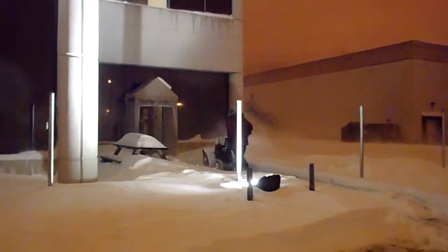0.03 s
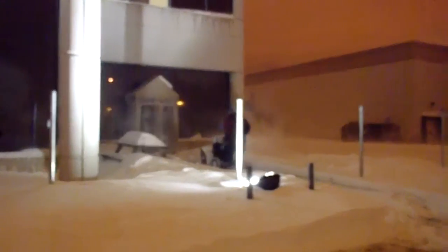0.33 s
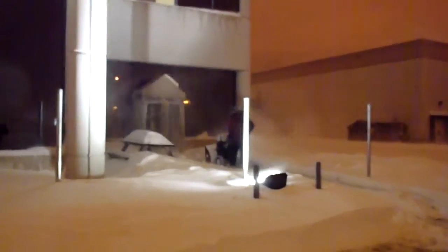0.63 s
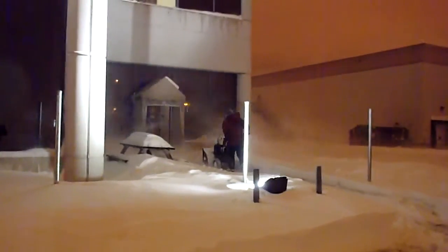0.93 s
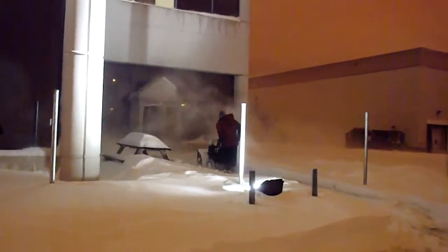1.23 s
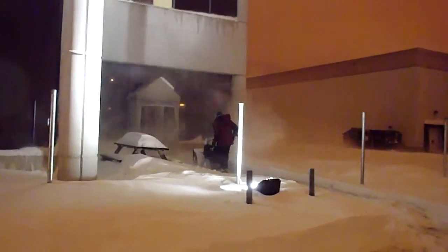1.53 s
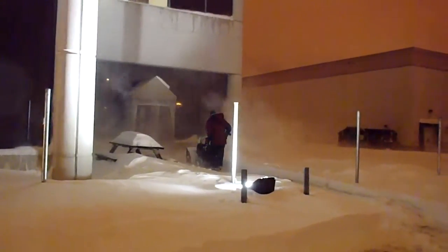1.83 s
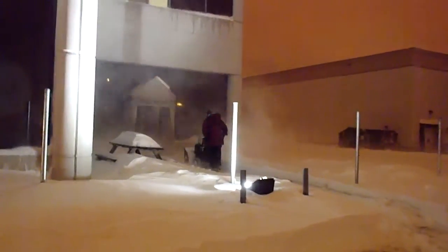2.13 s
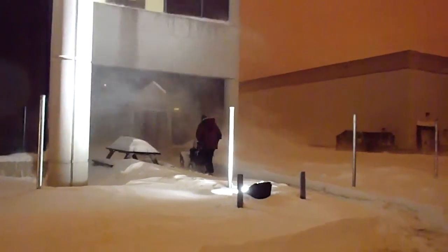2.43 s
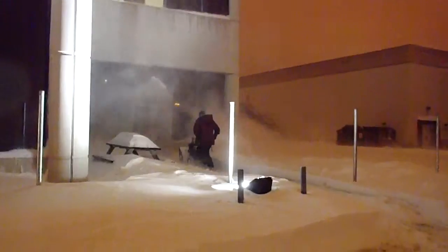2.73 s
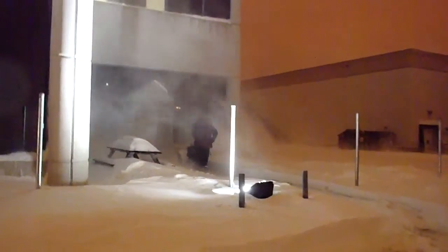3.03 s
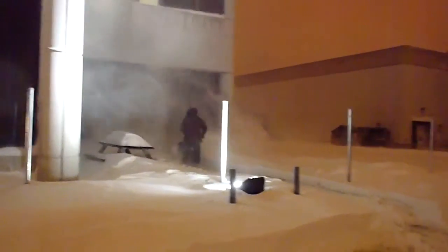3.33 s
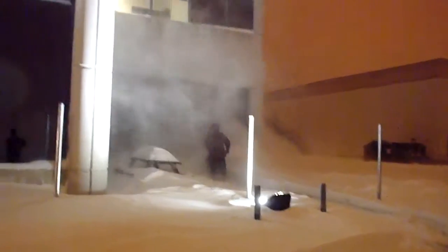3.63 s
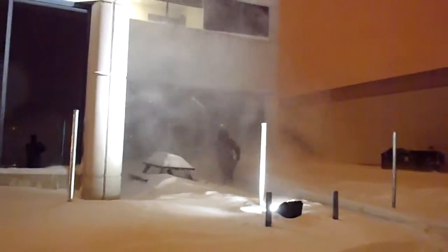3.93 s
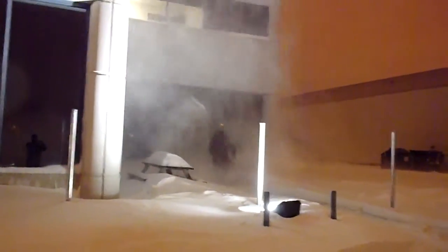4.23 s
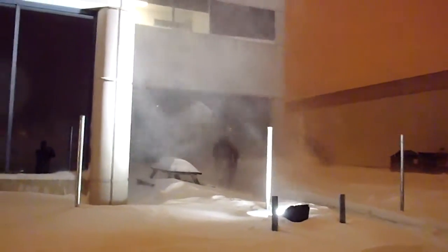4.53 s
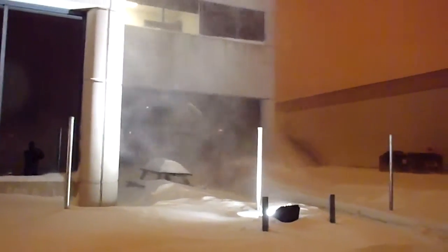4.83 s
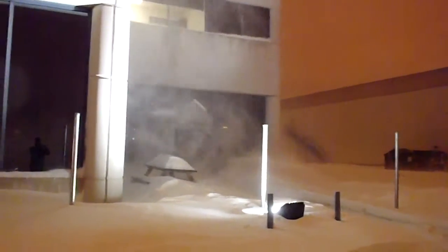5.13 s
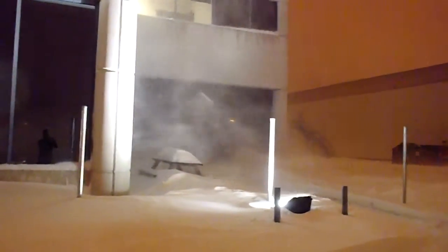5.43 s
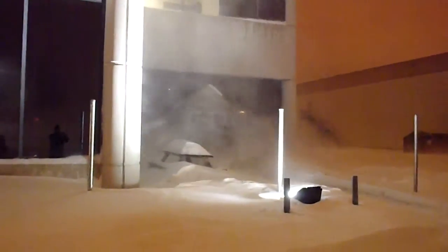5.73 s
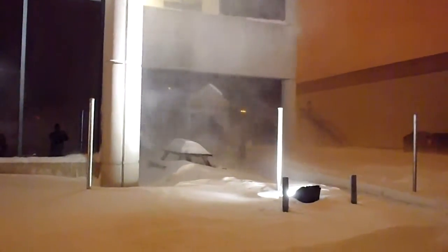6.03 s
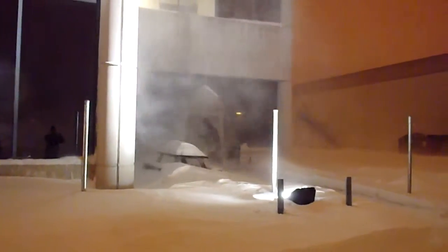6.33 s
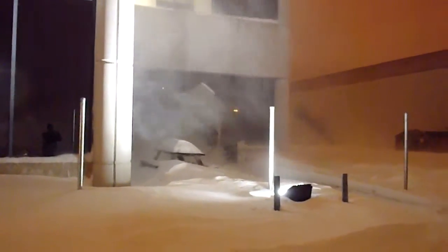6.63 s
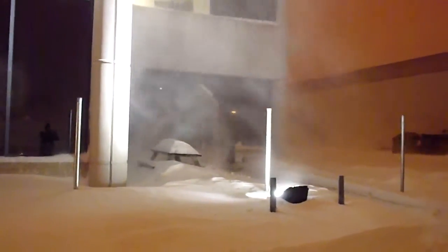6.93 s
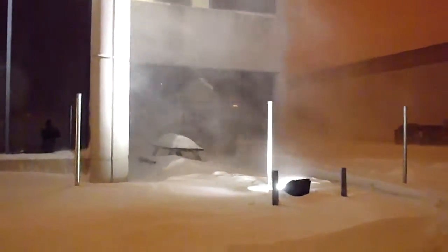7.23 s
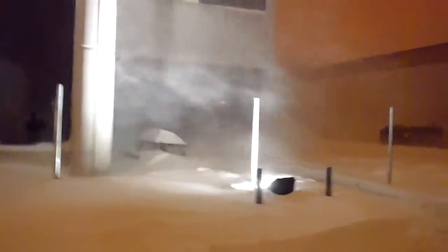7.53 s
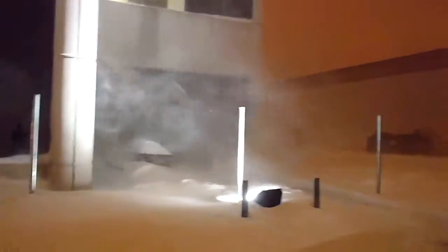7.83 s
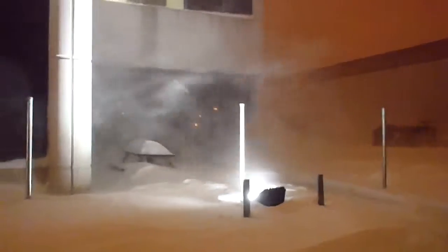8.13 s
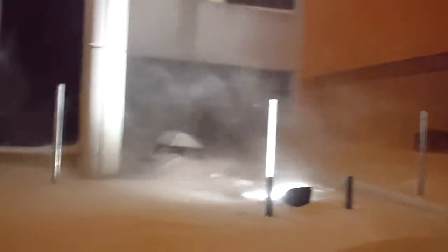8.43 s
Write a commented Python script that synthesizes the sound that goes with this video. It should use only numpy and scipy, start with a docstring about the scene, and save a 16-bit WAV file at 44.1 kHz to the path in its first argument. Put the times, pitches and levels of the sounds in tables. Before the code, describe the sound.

A snow blower engine chugs rapidly and fades away as gusty wind buffets, rumbles and crackles on the microphone.

```python
"""A snow blower works its way off through a night snowstorm, heard from a hand-held camera.
At first its single cylinder chuffs 25 times a second, each jet of gas ringing the muffler, while the
impeller churns snow and eddies thump the microphone. The engine gains a little speed, and by 5 s the
chuffs have faded into the rush; rubbing metal then squeals briefly. Toward the end the wind dominates
with rumble, blasts and crackle. Throughout, the gain control ducks behind loud blasts."""
import sys
import numpy as np
from scipy import signal
from scipy.fft import rfft, irfft
from scipy.io import wavfile
from scipy.ndimage import uniform_filter1d, map_coordinates

SR = 44100
rng = np.random.default_rng(int(sys.argv[2]) if len(sys.argv) > 2 else 0)


def log_audio(samples):
    """Write samples as a 16-bit WAV file to the path given in sys.argv[1]."""
    # one column per channel
    frames = np.atleast_2d(samples).T
    # limit to full scale, then quantise
    limited = np.clip(frames, -1, 1)
    pcm = np.round(limited * 32767).astype(np.int16)
    wavfile.write(sys.argv[1], SR, pcm)


N = 383669
TIME = np.arange(N) / SR

# engine speed: time_s, firing_rate_hz
FIRING_RATE = [(0.0, 25.1), (0.5, 24.92), (1.0, 24.99), (1.4, 25.1), (1.8, 25.75), (2.2, 26.1),
               (2.6, 26.57), (3.0, 26.71), (3.4, 26.94), (3.8, 27.02), (4.2, 26.88), (4.6, 26.9),
               (5.0, 27.0), (5.4, 28.5), (5.8, 28.6), (6.3, 28.0), (7.0, 28.0), (8.7, 28.0)]
# loudness of the chuffs, dipping under the wind and fading out by 5 s: time_s, level_db
CHUFF_LEVEL = [(0.0, -17.5), (0.35, -19), (0.47, -31.5), (0.8, -22.5), (1.05, -20), (1.42, -22), (1.9, -30),
               (2.2, -27.5), (2.35, -20), (2.46, -33), (2.8, -28), (3.05, -21), (3.26, -28), (3.54, -23),
               (4.25, -28), (4.5, -36), (5.0, -46.5), (8.7, -52.5)]
# firings that crack harder than their neighbours: time_s, extra_db
HARD_FIRINGS = [(0.61, 3.5), (1.21, 2.5), (1.69, 7), (2.30, 2), (2.38, 3), (2.53, 6.5), (2.94, 4),
                (3.09, 5), (3.43, 6), (3.47, 5), (3.54, 4.5), (3.76, 5.5), (3.80, 1.5), (4.02, 6.5),
                (4.24, 4)]
# modes of the muffler's sheet metal: pitch_hz, width_hz, gain_db
MUFFLER_MODES = [(2750, 32, -3), (3206, 32, -6), (3506, 14, 1), (5250, 120, -13)]
# how strongly those modes ring: time_s, gain_db
MUFFLER_RING = [(0, -17), (1.2, 7.5), (1.9, -16), (2.35, 6.5), (2.9, 2), (3.4, -1.5), (3.7, 6.5),
                (4.2, 4.5), (5, 3)]
# reflections off building fronts: delay_s, gain_db
WALL_ECHOES = [(0.012, -26), (0.023, -21), (.047, -24.5)]
# low harmonics of the exhaust: multiple_of_firing_rate, level_db
DRONE_HARMONICS = [(2, -40.5), (3, -38.5), (4, -46.5), (5, -36), (6, -40), (7, -53), (9, -42.5),
                   (10, -48.5)]
# rush of the machine and its thrown snow: time_s, level_db
RUSH_LEVEL = [(0.0, -36), (0.5, -47), (1.06, -36.5), (1.4, -45), (1.65, -37), (2.1, -47), (2.74, -42),
              (3.05, -54), (3.3, -44.5), (3.56, -32), (3.85, -45), (4.2, -34), (4.8, -42), (5.2, -33.5),
              (5.75, -41), (6.25, -37), (6.55, -40), (8.7, -50)]
# squeals of rubbing metal: centre_s, level_db, length_s, pitch_hz, nominal_width_hz
SQUEALS = [(4.995, -33, 0.012, 2930, 200), (5.524, -49, 0.46, 1146, 20), (5.876, -41, 0.073, 2640, 200),
           (6.103, -38, 0.076, 2620, 180), (6.208, -37.5, 0.079, 2610, 220), (6.24, -39, 0.047, 2980, 360)]
# wind between the blasts: time_s, buffeting_db, rumble_db
BREEZE = [(0.0, -32.5, -33), (0.3, -30.5, -27), (0.68, -37, -21), (0.85, -36, -42), (1.05, -22.5, -33),
          (1.52, -31, -24.5), (1.85, -24, -25.5), (2.72, -21, -23), (2.92, -33.5, -37),
          (3.15, -22.5, -18.5), (3.45, -29, -30.5), (3.92, -26.5, -29), (4.2, -19.5, -25),
          (5.2, -21, -23.5), (5.6, -35.5, -43), (5.95, -19.5, -27.5), (7.05, -20, -18.5), (8.7, -25, -19.5)]
# hard blasts of wind: centre_s, level_db, length_s, relative_rasp_db, relative_thump_db
BLASTS = [(0.213,-27,0.055,-16,3), (0.394,-18,0.049,-12,-4), (0.454,-23,0.013,-9,-11),
          (0.508,-17,0.036,-14,1), (0.641,-13.5,0.025,-18.5,-5), (0.686,-16.5,0.019,-16,-2),
          (0.746,-13.5,0.031,-15,-3), (0.793,-16.5,0.015,-20,-10), (0.977,-9.5,0.0037,-10,-13),
          (1.159,-14,0.017,-10,-21), (1.229,-15.5,0.032,-17.5,-15), (1.299,-15.5,0.007,-14,-14),
          (1.376,-19,0.05,-13,1), (1.418,-17.5,0.023,-6,-15), (1.623,-23,0.0064,-7,7.5),
          (1.697,-20,0.011,-11.5,2), (1.755,-14.5,0.013,-9.5,-11), (1.81,-16,0.063,-12,-2),
          (1.911,-20.5,0.024,-11,-11), (1.998,-21.5,0.028,-8.5,-9), (2.102,-18.5,0.011,-5.5,-21),
          (2.152,-20.5,0.017,-10.5,-23), (2.233,-7.5,0.01,-15.5,-0.5), (2.383,-14.5,0.025,-11.5,1),
          (2.482,-14,0.013,-12.5,-11), (2.567,-11.5,0.0077,-9,-5), (2.653,-10.5,0.0083,-12,-2.5),
          (2.768,-19.5,0.0088,-13,-6), (2.853,-10.5,0.01,-14,-1), (3.027,-15.5,0.017,-16,-23),
          (3.07,-9,0.015,-15,-7), (3.104,-9,0.014,-11.5,2.5), (3.26,-21,0.033,-16,1),
          (3.698,-24,0.045,-12,-4), (3.829,-22.5,0.017,-30,0), (4.075,-13.5,0.011,-32,-3.5),
          (4.233,-8.5,0.019,-18.5,-16), (4.428,-6,0.013,-18.5,-1.5), (4.477,-13,0.038,-20.5,-4),
          (4.559,-10.5,0.032,-11,-18), (4.623,-19,0.018,-14.5,-1), (4.731,-10.5,0.036,-17,-3),
          (4.769,-6.5,0.015,-16.5,-7), (4.901,-13,0.026,-15,5), (5.048,-10.5,0.03,-14,-2),
          (5.243,-18,0.018,-22,-11), (5.337,-12.5,0.021,-24,-4), (5.914,-18,0.054,-14.5,-9),
          (5.977,-11,0.0055,-12,-10), (6.057,-15.5,0.04,-17.5,-23), (6.172,-22,0.013,-26,-15),
          (6.266,-14,0.014,-13,-10), (6.387,-15.5,0.04,-16.5,-13), (6.477,-9.5,0.026,-15,-12),
          (6.571,-14.5,0.021,-13.5,6.5), (6.65,-15,0.019,-8.5,4), (6.719,-18,0.031,-25,1),
          (6.789,-20,0.035,-17.5,-8), (6.845,-8.5,0.028,-16.5,-19), (6.897,-14,0.034,-18.5,-4.5),
          (7.015,-10.5,0.023,-18,-14), (7.061,-14.5,0.025,-18.5,-1), (7.171,-4,0.011,-18.5,-8),
          (7.196,-7.5,0.018,-17,-1), (7.301,-12,0.02,-15,-9), (7.325,-16.5,0.014,-10,-8),
          (7.428,-7.5,0.041,-12.5,5), (7.494,-6.5,0.021,-20.5,9.5), (7.631,-7.5,0.033,-12.5,6),
          (7.72,-9,0.028,-15,-18), (7.78,-19.5,0.014,-16.5,1), (7.936,-12.5,0.055,-11,5),
          (8.14,-16.5,0.026,-10,2.5), (8.193,-16,0.011,-11,-12), (8.245,-13.5,0.022,-9.5,6),
          (8.281,-14,0.019,-4.5,-2), (8.318,-12,0.005,-14,-3), (8.41,-20,0.021,-11.5,6.5),
          (8.447,-23,0.045,-6,-7), (8.516,-14.5,0.009,-14,-4), (8.601,-15,0.057,-10,-14)]
# harshness of the wind as its angle to the microphone port changes: time_s, gain_db
SPIT_GAIN = [(0, -14), (1.7, -27), (3, 3), (4.5, -11.5), (6, -23), (6.5, -3.5), (7.3, -11), (7.7, -1.5),
             (8.2, -6.5), (8.7, -0.5)]
# the sharpest crackles: centre_s, level_db, relative_treble_db
SNAPS = [(1.363, -13.5, -23), (1.629, -17, -37), (1.743, -20.5, -35), (2.1, -17, -40), (2.164, -20.5, -42),
         (2.239, -10, -38), (2.65, -31, -38), (4.425, -14, -40.5), (4.562, -12, -38), (5.043, -15, -41),
         (6.484, -9.5, -36), (6.643, -17, -23), (7.173, -22, -21), (7.191, -8.5, -31), (7.294, -29, -35),
         (7.609, -16, -28), (7.725, -9.5, -21), (7.935, -20, -20), (8.274, -15, -29.5), (8.514, -22, -37),
         (8.57, -20.5, -25), (8.59, -14.5, -21)]
# low boom wavering under the wind: time_s, pitch_hz, level_db
BOOM = [(0, 139, -22.5), (.4, 136, -43), (1.0, 144, -26), (1.6, 109, -38.5), (3.3, 100, -35),
        (4.1, 147, -26), (4.9, 108, -35), (5.55, 112.5, -28.5), (6.5, 124, -31), (7.8, 79, -38),
        (8.7, 108.5, -36.5)]

# spectral shapes of the noises: frequency_hz, relative_density_db
CHUFF_SPECTRUM = [(300, -9.5), (1000, -7), (1700, -9.5), (2300, -5.5), (2750, 1.5), (3450, 3.5),
                  (3900, -6.5), (4500, -11), (5200, -14), (6200, -22.5), (7800, -29), (10000, -56.5),
                  (14000, -66)]  # gas through the muffler
SIZZLE_SPECTRUM = [(4000, -33.5), (6000, 8), (8200, -9), (8750, -3.5), (9800, -1), (10700, -6.5),
                   (11400, -9), (13400, -12.5), (14500, -35)]  # treble of jets and snaps
RUSH_SPECTRUM = [(150, -1.5), (500, -0.5), (1150, 1.5), (1700, -4.5), (2350, -1), (2650, 1.5), (3000, 3),
                 (3480, 1), (3750, -7), (4350, -16), (4950, -13.5), (5750, -23.5), (7500, -35.5),
                 (14000, -65)]  # churned snow
SPRAY_SPECTRUM = [(5000, -19.5), (7500, 0), (9200, -3.5), (10500, -13), (14000, -24)]  # thin snow spray
EDDY_SPECTRUM = [(30, -12.5), (90, -8), (160, 1.5), (260, -0.5), (400, -5), (600, -10.5), (900, -20.5),
                 (1300, -30.5), (2000, -48.5), (5000, -92)]  # eddies at the port
RASP_SPECTRUM = [(200, -7), (700, 9.5), (1200, 5), (1600, 0.5), (2200, -4), (2800, -4.5), (3450, -7.5),
                 (4100, -20.5), (6000, -35), (14000, -73.5)]  # tearing flow
SPIT_SPECTRUM = [(500, -25), (1500, 0), (2200, -1.5), (2800, 10), (3450, 6), (4100, -9.5), (5100, -16),
                 (6200, -22.5), (8000, -33.5), (10000, -55), (14000, -57.5)]  # its harsh upper band
RUMBLE_SPECTRUM = [(25, -23.5), (50, -14.5), (75, 0.5), (115, -3.5), (150, -7), (210, -21), (400, -48.5),
                   (1500, -96)]  # large eddies
DEEP_SPECTRUM = [(8, -15), (22, -5.5), (40, -4), (60, -4), (120, -27), (600, -99)]  # their lowest band


def exhaust(first_firing_s=0.006, jitter_s=0.00016, crest_s=0.0016, rise_s=0.0028, hold_s=0.0021,
            fall_s=0.0025, leak=0.077, uneven_db=2.45, grit_db=2.5):
    """Pulsed jet noise: each firing releases turbulent gas, which excites the muffler's modes."""
    rate_hz = curve(FIRING_RATE)
    cycles = np.cumsum(rate_hz) / SR - first_firing_s * rate_hz[0]
    firing = np.floor(cycles + .5).astype(int)  # index of the nearest firing
    strength, timing = rng.standard_normal((firing[-1] + 1, 2))[firing].T
    age_s = (cycles - firing) / rate_hz + jitter_s * timing - crest_s
    # the valve opens, the pressure drains away, and a little gas keeps leaking between firings
    opening = 1 / (1 + (np.minimum(age_s, 0) / rise_s) ** 2) ** 4.2
    jet = leak + opening * np.exp(-np.maximum(age_s - hold_s, 0) / fall_s)
    level_db = curve(CHUFF_LEVEL) + uneven_db * strength
    for time_s, extra_db in HARD_FIRINGS:
        level_db += extra_db * (firing == firing[int(time_s * SR)])
    level = gain_of(level_db)
    turbulence = level * jet * noise() * gain_of(grit_db * wander(1500))
    hiss = gain_of(-3) * coloured(turbulence, CHUFF_SPECTRUM)
    modes = sum(gain_of(db) * resonance(hiss, hz, width_hz) for hz, width_hz, db in MUFFLER_MODES)
    ring = gain_of(curve(MUFFLER_RING)) * modes
    # only the fastest part of the jet sizzles, and the more so the louder the chuff
    excess_db = np.maximum(level_db + 31, 0)
    sizzle_level = level * gain_of(-39 + 1.1 * excess_db)
    sizzle = coloured(sizzle_level * jet ** 1.6 * noise(), SIZZLE_SPECTRUM)
    return hiss + ring + sizzle + wall_echoes(hiss) + drone(cycles)


def drone(cycles, waver_db=2, waver_hz=5.4):
    """A periodic flow radiates harmonics: the exhaust hums at multiples of the firing rate."""
    hum = np.zeros(N)
    for harmonic, db in DRONE_HARMONICS:
        amplitude = np.sqrt(2) * gain_of(db + waver_db * wander(waver_hz))
        hum += amplitude * np.sin(2 * np.pi * (harmonic * cycles + rng.random()))
    return hum


def wall_echoes(x):
    """Specular reflection: each building front returns a delayed, weaker copy."""
    return sum(gain_of(db) * np.interp(TIME - delay_s, TIME, x, left=0) for delay_s, db in WALL_ECHOES)


def impeller_rush(flutter_db=2.0, grain_db=1.0):
    """Amplitude-modulated noise: churned snow hisses, with a thin spray when the impeller bites hard."""
    level_db = curve(RUSH_LEVEL) + flutter_db * wander(110) + grain_db * wander(1100)
    spray_db = -74 + 1.2 * (level_db + 35)
    churn = coloured(gain_of(level_db - 1.5) * noise(), RUSH_SPECTRUM)
    return churn + coloured(gain_of(spray_db) * noise(), SPRAY_SPECTRUM)


def squeals():
    """Friction excites a narrow resonance, so that rubbing metal sings briefly."""
    out = np.zeros(N)
    for centre_s, db, length_s, hz, width_hz in SQUEALS:
        near, swell = bell(centre_s, length_s)
        tone = resonance(resonance(noise()[near], hz, 2 * width_hz), hz, 2 * width_hz)
        out[near] += gain_of(db) * np.sqrt(swell) * unit_rms(tone)
    return out


def wind(grit_db=2.0, flap_db=3.5, rasp_flap_db=4.0):
    """Turbulent pressure thumps the microphone port; at its peaks the flow tears into a spitting rasp."""
    push, rasp, thump = air_flow()
    flap = wander(130)  # the flow flaps within each blast
    eddies = steadied(coloured(noise(), EDDY_SPECTRUM), 0.024)
    buffeting = gain_of(0.88 + flap_db * flap) * push * eddies
    roughness = gain_of(grit_db * wander(700) + rasp_flap_db * flap)
    torn = rasp * unit_rms((abs(eddies) + 0.18) ** 0.93 * roughness)
    rasping = gain_of(3.5) * coloured(torn * noise(), RASP_SPECTRUM)
    spitting = coloured(gain_of(curve(SPIT_GAIN) - 6) * torn * noise(), SPIT_SPECTRUM)
    return buffeting + rumble(thump) + rasping + spitting + crackles(rasp)


def air_flow(calm_rasp_db=-22, lump_db=3.5, lump_hz=40, shortest_thump_s=0.019):
    """Incoherent powers add: breeze and blasts set the amplitudes of buffeting, rasp and rumble."""
    lumps_db = lump_db * np.minimum(wander(lump_hz), 1.5)
    push_power = gain_of(curve(BREEZE) + lumps_db) ** 2 / 2
    rasp_power = push_power * gain_of(calm_rasp_db) ** 2
    thump_power = gain_of(curve(BREEZE, column=2) + 0.73 * lumps_db) ** 2
    for centre_s, db, length_s, rasp_db, thump_db in BLASTS:
        near, swell = bell(centre_s, length_s)
        push_power[near] += gain_of(db) ** 2 * swell
        rasp_power[near] += gain_of(db + rasp_db) ** 2 * swell
        near, swell = bell(centre_s, np.hypot(length_s, shortest_thump_s))
        thump_power[near] += gain_of(db + thump_db) ** 2 * swell
    return np.sqrt(push_power), np.sqrt(rasp_power), np.sqrt(thump_power)


def crackles(rasp, length_s=0.002, small_per_s=22, small_treble_db=-33):
    """Overload at the port gives broadband impulses: hard snaps, and chance ones as strong as the rasp."""
    body, treble = np.zeros((2, N))
    small_at = np.flatnonzero(rng.random(N) < small_per_s / SR)
    small_snaps = [(TIME[i], 20 * np.log10(rasp[i]), small_treble_db) for i in small_at]
    for centre_s, db, treble_db in list(SNAPS) + small_snaps:
        near, swell = bell(centre_s, length_s)
        body[near] += gain_of(db) * np.sqrt(swell)
        treble[near] += gain_of(db + treble_db) * swell
    crack = gain_of(-3) * coloured(body * noise(), RASP_SPECTRUM)
    spit = coloured(gain_of(curve(SPIT_GAIN) - 2) * body * noise(), SPIT_SPECTRUM)
    return crack + spit + gain_of(-6) * coloured(treble * noise(), SIZZLE_SPECTRUM)


def rumble(strength, swell_hz=5):
    """Large eddies pass slowly, so their pressure lies at low frequencies; it swells with each blast."""
    roll = gain_of(-2.5) * steadied(coloured(noise(), RUMBLE_SPECTRUM), 0.027)
    deep = gain_of(-6 - 0.5 * wander(swell_hz)) * steadied(coloured(noise(), DEEP_SPECTRUM), 0.16)
    return strength * (roll + deep)


def boom(stage_width_hz=35):
    """Narrow-band noise is heard as a fuzzy low tone; its pitch and strength drift."""
    hz = curve(BOOM)
    tone = resonance(resonance(noise(), hz, stage_width_hz), hz, stage_width_hz)
    return gain_of(curve(BOOM, column=2) - 1) * steadied(tone, 0.13)


def gain_control(x, threshold_db=-16, share=0.49, sense_s=0.029, release_db_per_s=45, attack_s=0.002):
    """Compression: the gain falls by a share of the level above threshold, then recovers gradually."""
    power_db = 10 * np.log10(abs(uniform_filter1d(x[0] ** 2, int(sense_s * SR))) + 1e-12)
    release_db = TIME * release_db_per_s
    held_peak_db = np.maximum.accumulate(power_db + release_db) - release_db
    excess_db = np.maximum(held_peak_db - threshold_db, 0)
    pole = np.exp(-1 / (attack_s * SR))
    return x * gain_of(-share * signal.lfilter([1 - pole], [1, -pole], excess_db))


def resonance(x, hz, width_hz):
    """Heterodyne resonator of gain 1: shifts hz, which may move, to zero, smooths, and shifts back."""
    carrier = np.exp(2j * np.pi * np.cumsum(hz * np.ones(len(x))) / SR)
    pole = np.exp(-np.pi * width_hz / SR)
    return 2 * (carrier * signal.lfilter([1 - pole], [1, -pole], x / carrier)).real


def coloured(x, spectrum):
    """Minimum-phase filter with the given spectral shape; white input keeps its power."""
    hz, db = np.transpose(spectrum)
    log_hz = np.log(abs(np.fft.fftfreq(N, 1 / SR)) + 1)
    gain = unit_rms(gain_of(np.interp(log_hz, np.log(hz), db)))
    response = np.exp(np.conj(signal.hilbert(np.log(gain))))
    return irfft(rfft(x) * response[:N // 2 + 1], N)


def bell(centre_s, length_s, lean=0.12):
    """Skewed Gaussian: the samples near centre_s, and a swell that rises faster than it dies."""
    near = slice(*np.searchsorted(TIME, [centre_s - 2 * length_s, centre_s + 2 * length_s]))
    offset = 2 * (TIME[near] - centre_s) / length_s + lean
    return near, .5 ** ((offset / (1 + lean * np.sign(offset))) ** 2)


def steadied(x, window_s):
    """Division by the running rms evens out the slow swells of a noise."""
    size = int(window_s * SR)
    power = uniform_filter1d(uniform_filter1d(x ** 2, size), size)
    return x / np.sqrt(abs(power) + 1e-12)


def wander(hz):
    """Random modulation of rms 1 that changes about hz times a second."""
    points = rng.standard_normal(N // 8)
    return unit_rms(map_coordinates(points, [TIME * hz], order=1, mode="wrap"))


def noise():
    """Gaussian white noise."""
    return rng.standard_normal(N)


def curve(rows, column=1):
    """Linear interpolation of one column of a timed table, at every sample."""
    columns = np.transpose(rows)
    return np.interp(TIME, columns[0], columns[column])


def unit_rms(x):
    """Normalisation to rms 1."""
    return x / np.sqrt(np.mean(x ** 2) + 1e-20)


def gain_of(db):
    """Decibels to amplitude ratio."""
    return 10 ** (np.asarray(db) / 20)


def scene():
    """Superposition: the pressures of machine and wind add at one microphone."""
    return (exhaust() + impeller_rush() + squeals() + boom() + wind())[None]


def record(dry):
    """Compression ducks the blasts, soft saturation rounds the peaks, and a low-pass limits the band."""
    ceiling, cutoff_hz = .65, 14600
    ducked = gain_control(dry)
    saturated = ducked / (1 + (ducked / ceiling) ** 6) ** (1 / 6)
    low_pass = signal.firwin(255, cutoff_hz, window=("kaiser", 9), fs=SR)
    return signal.oaconvolve(saturated, low_pass[None], "same")


dry = scene()
out = record(dry)
log_audio(out)
```